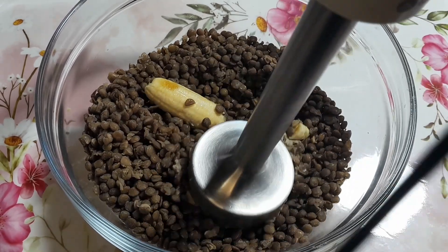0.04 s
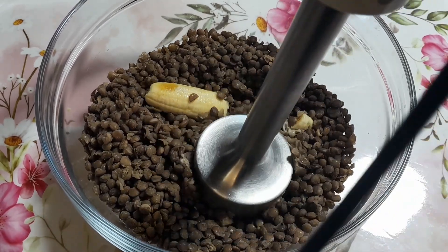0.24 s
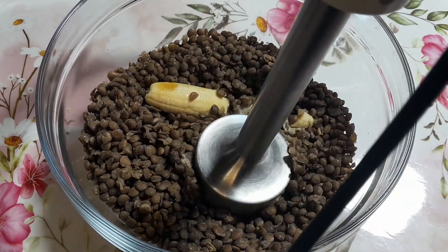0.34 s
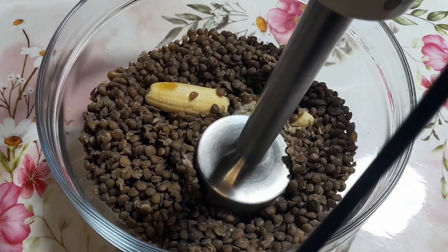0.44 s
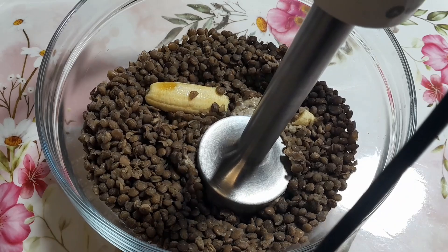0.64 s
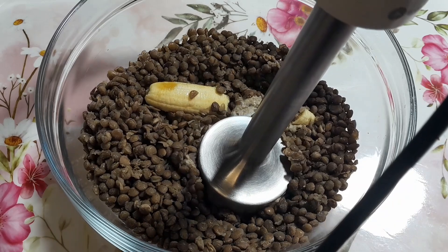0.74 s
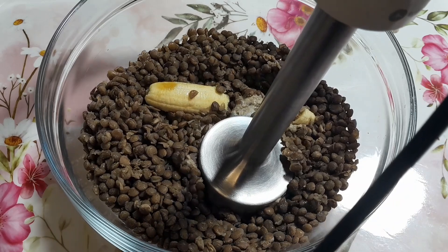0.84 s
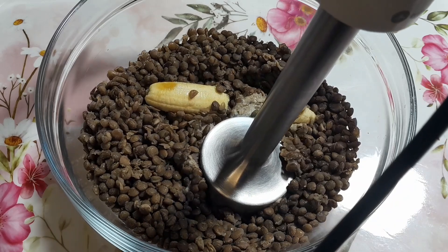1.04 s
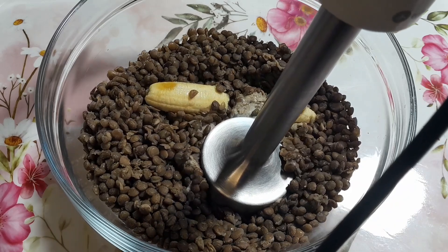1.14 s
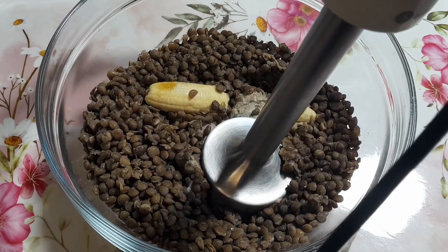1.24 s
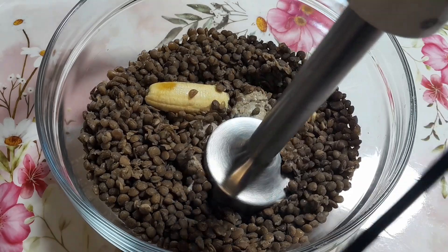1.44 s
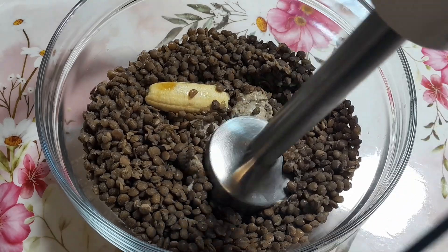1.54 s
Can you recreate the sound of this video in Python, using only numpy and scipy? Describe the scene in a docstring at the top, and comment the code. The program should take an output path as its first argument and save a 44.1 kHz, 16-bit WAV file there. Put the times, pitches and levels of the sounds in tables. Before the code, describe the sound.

A hand blender starts abruptly in a glass bowl of dry pellets, whirring with a dense harsh rattle, then a few sharp knocks as it is let go and fades; quiet kitchen, close stereo microphone.

```python
"""A quiet kitchen with a low hum; a hand rustles and ticks faintly, then switches on a hand blender in a bowl of pellets.
It starts with low thumps. The windings hum, the shaft sounds a row of multiples of its turning rate, and the blade
smashes pellets against guard and bowl in a dense rattle of random hits. Brushes and cooling air hiss above (filtered
noise) and the shaking body rumbles below. After a run at speed come loud pellet knocks; the blender is let go, and
its sound sinks and dulls without falling in pitch."""
import sys
import numpy as np
from scipy import signal
from scipy.io import wavfile

SR = 44100
rng = np.random.default_rng(int(sys.argv[2]) if len(sys.argv) > 2 else 0)


def makeup_ratio(level_db):
    """Linear amplitude ratio for a level in decibels (20 dB per factor of ten)."""
    decades = np.asarray(level_db, float) / 20
    return 10 ** decades


def to_wav(sig):
    """Store sig (one row per channel, or 1-D mono) as 16-bit WAV at the path in sys.argv[1].

    Samples outside -1..1 are clipped; the rate is SR.
    """
    pcm = np.clip(np.atleast_2d(sig), -1, 1) * 32767
    pcm = np.round(pcm).astype(np.int16)
    wavfile.write(sys.argv[1], SR, pcm.T)  # frames by channels


N = 70560  # length in samples
TIME = np.arange(N) / SR  # seconds
SIDES = np.array([[1], [-1]])  # left, right
ON_S, OFF_S = 0.192, 1.39  # switched on, let go

# Background noise of the room. Each row: frequency in Hz, relative level in dB per Hz.
ROOM_SPECTRUM = [(15, -51), (25, -36), (104, 2), (164, -12.5), (582, -17), (722, -25), (1080, -16),
                 (1200, -28), (3440, -34.5), (6050, -32), (10400, -31), (13200, -44), (15500, -30)]
ROOM_DB = -65
# Steady hum of the room. Each row: frequency in Hz, rms level in dB before a slow waver.
ROOM_HUM = [(102, -67), (318, -80), (425, -82), (1906, -92)]

# Finger tick, then the switch contact. Each row: start in seconds, starting level in dB before noise and filter.
SWITCH_TICKS = [(0.0942, -54), (0.1933, -37)]
TICK_T60_S = 0.025  # time to fall by 60 dB
RUSTLE_DB, RUSTLE_S, RUSTLE_WIDTH_S = -69, 0.085, 0.065  # level before flutter and filter, middle, width

MAINS_HZ, MAINS_DB, MAINS_WAVER_DB, MAINS_FADE_S = 99.8, -49.5, 3, 0.25

# Speed of the shaft before jitter. Each row: time in seconds, speed in turns per second.
SHAFT_SPEED = [(.19, 144), (.22, 155), (.25, 177), (.3, 181), (.5, 189), (.8, 195), (1.1, 200),
               (1.6, 206.4)]
SPEED_JITTER = 0.0028  # as a share of the speed
# Blender loudness. Each row: time in seconds, level of shaft and rattle in dB, level of the hiss in dB.
BLENDER_LEVEL = [(.1925, -42, -47), (.2, -36.5, -49), (.212, -20.5, -37), (.245, -16, -33.5),
                 (.285, -16, -33), (.39, -17, -34), (.42, -18.5, -35), (.55, -20, -35.5), (.78, -21, -35.5),
                 (1.07, -20.5, -35), (1.17, -21, -34.5), (1.27, -22, -32.5), (1.35, -22, -33),
                 (1.378, -22.5, -29), (1.39, -23, -35), (1.42, -27.5, -40), (1.47, -30.5, -47),
                 (1.52, -35, -48.5), (1.55, -35.5, -53.5), (1.6, -40, -58)]

# Shaft tones while running up. Each row: multiple of the turning rate, relative level in dB.
ORDERS_RUNNING_UP = [(1, -9.5), (2, -11.5), (3, 1.5), (4, -2), (5, -2), (6, -4), (7, -2.5), (8, 1), (9, 1),
                     (10, 1.5), (11, -16), (12, 0), (13, -12), (14, -20)]
# Shaft tones while biting in. Each row: multiple of the turning rate, relative level in dB.
ORDERS_BITING = [(1, -16.5), (2, 0.5), (3, -9), (4, -11.5), (5, 0), (6, 3), (7, 6.5), (8, 3), (9, -9),
                 (10, -19), (11, -13), (12, -6), (13, -4), (14, -19)]
# Shaft tones under load. Each row: multiple of the turning rate, relative level in dB.
ORDERS_LOADED = [(1, -13), (2, -2), (3, -4.5), (4, 1.5), (5, -9), (6, 3), (7, 4.5), (8, 5), (9, 6.5),
                 (10, -18), (11, 0), (12, 2), (13, -10), (14, -16)]
# Shaft tones while running free. Each row: multiple of the turning rate, relative level in dB.
ORDERS_RUNNING_FREE = [(1, -14), (2, -5.5), (3, -3.5), (4, 2), (5, -2.5), (6, -33), (7, -3), (8, -4.5),
                       (9, -9), (10, -4), (11, -7.5), (12, -5), (13, -5), (14, -8.5)]
START_S, BITE_S, LOAD_S, FREE_S = 0.35, 0.47, 0.51, 1  # when each of the four holds
SHAFT_DB, SHAFT_RISE_S, SHAFT_FADE_S = -8.5, 0.064, 0.19
SHAFT_WANDER_DB, SHAFT_WANDER_HZ, SHAFT_FLUTTER_DB = 1.5, 6.2, 2

# Ring of guard and bowl under the hits. Each row: frequency in Hz, relative level in dB per Hz.
RATTLE_SPECTRUM = [(160, -48), (280, -21), (388, -12), (432, -12.5), (577, -7.5), (692, -13.5), (780, -3.5),
                   (1090, -6), (1380, -1), (2640, -9), (5000, -21.5), (6500, -41), (11000, -120)]
RATTLE_DB, HITS_PER_S, HIT_SPREAD_DB, TURN_BEAT = -0.5, 5000, 3, 0.12  # hits in each of four streams
DULLING_DB_PER_S = 27  # for each octave above 1 kHz, after letting go

# Hiss of brushes and cooling air. Each row: frequency in Hz, relative level in dB per Hz.
HISS_SPECTRUM = [(2060, -42), (3500, -1.5), (3740, -7), (4280, -14), (6220, -8.5), (7070, -8.5),
                 (8600, -3.5), (9090, -8), (9720, -17), (11300, -10.5), (12600, -21.5), (13700, -14),
                 (14500, -17), (15100, -22)]
# How alike the hiss is left and right. Each row: frequency in Hz, likeness with 1 for the same.
HISS_ALIKE = [(3500, 0.17), (6000, 0.14), (9000, 0.17), (15000, 0.21)]

# Low thumps at the start, then loud pellet knocks around letting go.
# Each row: start in seconds, starting level in dB before filter and panning, pitch in Hz.
KNOCK_ROWS = [(.193, -34.5, 560), (.201, -23, 595), (1.368, -14, 810), (1.377, -10.5, 882),
              (1.391, -11.5, 800), (1.499, -26, 790), (1.514, -24.5, 805)]
KNOCK_T60_S = 0.017  # time to fall by 60 dB

# Body shake through bowl and table. Each row: frequency in Hz, relative level in dB per Hz.
RUMBLE_SPECTRUM = [(15, -57), (25, -37), (92, -4), (152, -3.5), (203, -6.5), (239, -5), (330, 2.5),
                   (430, -40), (730, -120)]
# Loudness of that rumble. Each row: time in seconds, level in dB.
RUMBLE_LOUDNESS = [(.195, -61), (.22, -49.5), (.3, -38.5), (.45, -48), (.8, -44), (1.1, -46), (1.38, -40.5),
                   (1.45, -42.5), (1.52, -48), (1.6, -55)]

# How alike left and right are in the other noises. Each row: frequency in Hz, likeness (below 0 counts as 0).
ALIKE = [(60, 1), (150, 0.96), (380, 0.79), (950, 0.23), (2380, 0.92), (5980, -0.09), (15000, -0.21)]
# Where the sound sits between left and right. Each row: frequency in Hz, left minus right in dB.
SIDE_BALANCE = [(60, -7), (150, 6.5), (380, -2), (950, 7), (2380, 3), (5980, 3.0), (15000, 2)]
LEFT_LEADS = 3  # samples
OVERLOAD, CUTOFF_HZ = 0.9, 15080  # ceiling that peaks bend towards, upper edge of the sound


def in_time(rows):
    """Joins each column by straight lines in time; a level in dB starts 60 dB down before its first row."""
    seconds, *columns = np.transpose(rows)
    return [np.interp(TIME, seconds, c, left=c[0] - 60 * (c[0] < 0)) for c in columns]


def at_hz(points, hz):
    """Reads a table at one frequency, with frequency on a log axis."""
    table_hz, values = np.array(points).T
    return np.interp(np.log(hz), np.log(table_hz), values)


def rms_one(x):
    """Scales to an rms of 1."""
    return x / np.sqrt(np.mean(x ** 2) + 1e-20)


def filtered(x, order, hz, kind):
    """Keeps part of the spectrum with a Butterworth filter."""
    return signal.sosfilt(signal.butter(order, hz, kind, fs=SR, output="sos"), x)


def drift(rate):
    """Smooth chance wandering of spread 1: noise through a low-pass at `rate` Hz."""
    # made at every 40th sample; the first 2000 points let the filter settle
    r = np.exp(-2 * np.pi * rate * 40 / SR)
    slow = signal.lfilter([1], [1, -2 * r, r * r], rng.standard_normal(N // 40 + 2002))[2000:]
    return np.interp(np.arange(N) / 40, np.arange(len(slow)), rms_one(slow))


def place(hz):
    """Left and right gain at one frequency."""
    return makeup_ratio(at_hz(SIDE_BALANCE, hz) / 2 * SIDES)


def colour(drive, spectrum, patchy_db, likeness=ALIKE, dull_db=0):
    """Shapes two (mid, side) drives in narrow bands, each with its own level, flicker, likeness and side."""
    edges = np.r_[25 * 2 ** np.arange(0, 8, .2), np.arange(6400, 16500, 450)]
    out = 0
    for k, (low, high) in enumerate(zip(edges, edges[1:])):
        hz = np.sqrt(low * high)
        if not spectrum[0][0] * .8 < hz < spectrum[-1][0] * 1.2:
            continue
        # neighbouring bands take turns between the two drives
        mid, side = filtered(drive[k % 2], 2, [low, high], "band")
        alike = np.clip(at_hz(likeness, hz), 0, 1)
        gain = makeup_ratio(at_hz(spectrum, hz) + patchy_db * drift(7.4)) * place(hz)
        band = gain * (np.sqrt(1 + alike) * mid + np.sqrt(1 - alike) * side * SIDES)
        octaves_above_1k = max(np.log2(hz / 1000), 0)
        out = out + band * makeup_ratio(-dull_db * octaves_above_1k)
    return out / np.sqrt(np.mean(out.mean(0) ** 2))


def room():
    """Quiet background: shaped noise plus low sines that waver slowly."""
    # +3 dB turns rms into peak
    hum = sum(makeup_ratio(db + 3 + 1.5 * drift(8)) * np.sin(2 * np.pi * hz * TIME) for hz, db in ROOM_HUM)
    # the wander goes both ways, so its sign does not matter
    noise = colour(rng.standard_normal((2, 2, N)), ROOM_SPECTRUM, patchy_db=-1.5)
    # reversed in time, so the build-up of the filters falls at the end
    return makeup_ratio(ROOM_DB) * noise[:, ::-1] + hum


def finger():
    """The hand rustles as a swell of fluttering noise; the ticks are short bright noise bursts."""
    swell = makeup_ratio(RUSTLE_DB + 4.5 * drift(80)) * np.exp(-((TIME - RUSTLE_S) / RUSTLE_WIDTH_S) ** 2)
    rustle = filtered(swell * rng.standard_normal((2, N)), 3, [5800, 11500], "band")
    bursts = sum((TIME >= s) * makeup_ratio(db - 60 * np.maximum(TIME - s, 0) / TICK_T60_S) for s, db in SWITCH_TICKS)
    # one noise shared by both sides, one for each side
    noise = rng.standard_normal(N) + 1.35 * rng.standard_normal((2, N))
    return rustle + filtered(bursts * noise, 3, 5000, "high")


def mains():
    """The windings hum at twice the mains rate while switched on, then fade away."""
    on = (TIME > ON_S) * np.exp(-np.maximum(TIME - OFF_S, 0) / MAINS_FADE_S)
    return on * makeup_ratio(MAINS_DB + MAINS_WAVER_DB * drift(8)) * np.sin(2 * np.pi * MAINS_HZ * TIME)


def turns():
    """Adds up the jittery speed into the shaft angle in radians."""
    speed = in_time(SHAFT_SPEED)[0] * (1 + SPEED_JITTER * drift(20))
    return 2 * np.pi * np.cumsum(speed) / SR


def shaft(angle):
    """The turning shaft sounds sines at multiples of its rate, each wandering in level and between the sides."""
    out = 0
    stages = zip(ORDERS_RUNNING_UP, ORDERS_BITING, ORDERS_LOADED, ORDERS_RUNNING_FREE)
    for rows in stages:
        k = rows[0][0]
        # opposite phase shifts left and right widen the tone
        phase = (rng.normal(0, 0.39) + 0.042 * k * drift(10)) * SIDES
        db = np.interp(TIME, [START_S, BITE_S, LOAD_S, FREE_S], [level for _, level in rows])
        db = db + SHAFT_WANDER_DB * drift(SHAFT_WANDER_HZ) + SHAFT_FLUTTER_DB * drift(47)
        tone = np.sin(k * angle + rng.uniform(0, 2 * np.pi) + phase)
        out = out + place(k * SHAFT_SPEED[-1][1]) * makeup_ratio(db) * tone
    rise = np.clip((TIME - ON_S) / SHAFT_RISE_S, 0, 1)
    fade = np.exp(-np.maximum(TIME - OFF_S, 0) / SHAFT_FADE_S)
    return makeup_ratio(SHAFT_DB) * out * rise * fade


def rattle(angle):
    """Random pellet hits, stronger once a turn, ring the guard and bowl."""
    shape = (2, 2, N)
    hits = (rng.random(shape) < HITS_PER_S / SR) * rng.choice([-1, 1], shape)
    strength = makeup_ratio(HIT_SPREAD_DB * np.minimum(rng.exponential(1, shape), 5))
    hits = hits * strength * (1 + TURN_BEAT * np.cos(angle))
    dull_db = DULLING_DB_PER_S * np.maximum(TIME - OFF_S, 0)
    return makeup_ratio(RATTLE_DB) * colour(hits + 1e-18, RATTLE_SPECTRUM, patchy_db=1.13, dull_db=dull_db)


def hiss(angle):
    """Brushes and air hiss as noise that pulses with the shaft and flutters."""
    noise = rng.standard_normal((2, 2, N))
    beat = (1 + 0.1 * np.cos(angle)) * makeup_ratio(0.67 * drift(6.2) + 1.3 * drift(107))
    return colour(noise * beat, HISS_SPECTRUM, patchy_db=0.6, likeness=HISS_ALIKE)


def knocks():
    """Low thumps as the blender starts, then loud pellet knocks around letting go: pairs of quickly dying sines."""
    out = np.zeros(N)
    for s, db, hz in KNOCK_ROWS:
        t = np.maximum(TIME - s, 0)
        tones = np.sin(2 * np.pi * hz * t) + 0.42 * np.sin(2 * np.pi * 1.7 * hz * t)
        out += makeup_ratio(db - 60 * t / KNOCK_T60_S) * tones
    return place(1383) * filtered(out, 2, 450, "high")


def rumble():
    """The shaking body passes low noise through bowl and table."""
    level_db = in_time(RUMBLE_LOUDNESS)[0]
    return makeup_ratio(level_db) * colour(rng.standard_normal((2, 2, N)), RUMBLE_SPECTRUM, patchy_db=1.0)


def scene():
    """Adds the blender's layers to the room, with the right side slightly late."""
    angle = turns()
    low_db, high_db = in_time(BLENDER_LEVEL)
    x = rumble()
    x = x + makeup_ratio(low_db) * (shaft(angle) + rattle(angle)) + makeup_ratio(high_db) * hiss(angle)
    x = x + knocks() + mains() + finger() + room()
    return np.stack([x[0], np.pad(x[1], (LEFT_LEADS, 0), "edge")[:N]])


def roll_off(x):
    """The treble ends steeply here."""
    return signal.sosfilt(signal.butter(12, 16440, fs=SR, output="sos"), x)


def record(dry):
    """Rounds off the peaks, then cuts the top of the spectrum steeply."""
    rounded = OVERLOAD * np.tanh(dry / OVERLOAD)
    low_pass = signal.ellip(10, 1, 45, CUTOFF_HZ, fs=SR, output="sos")
    mix = signal.sosfilt(low_pass, rounded)
    return roll_off(mix)


dry = scene()
out = record(dry)
to_wav(out)
```